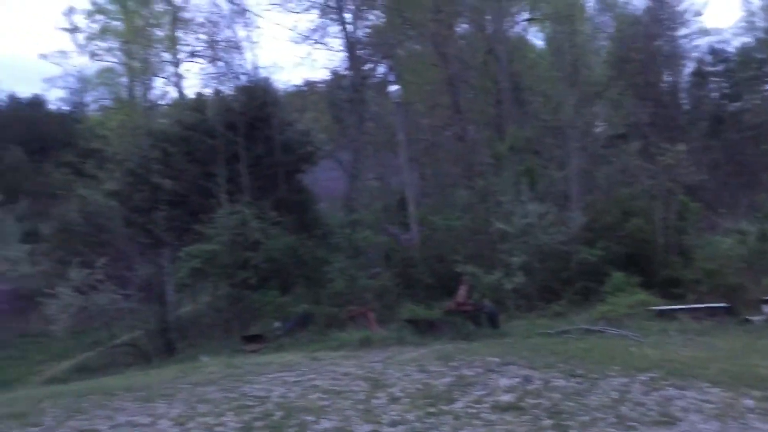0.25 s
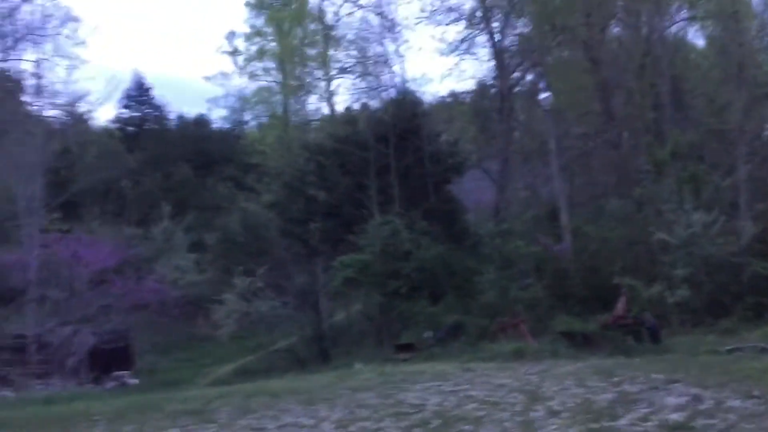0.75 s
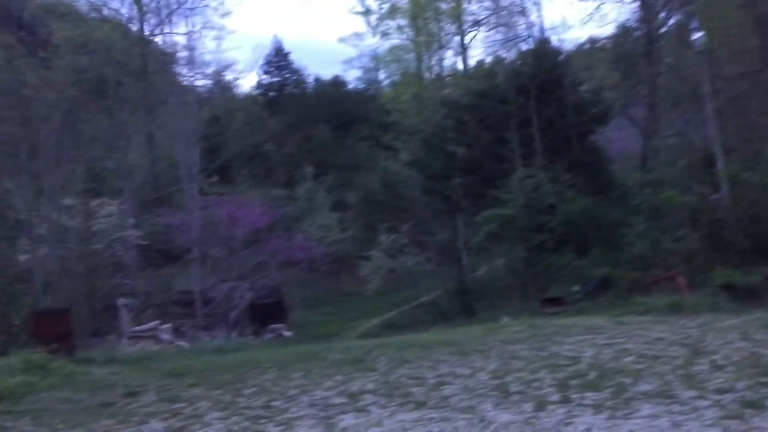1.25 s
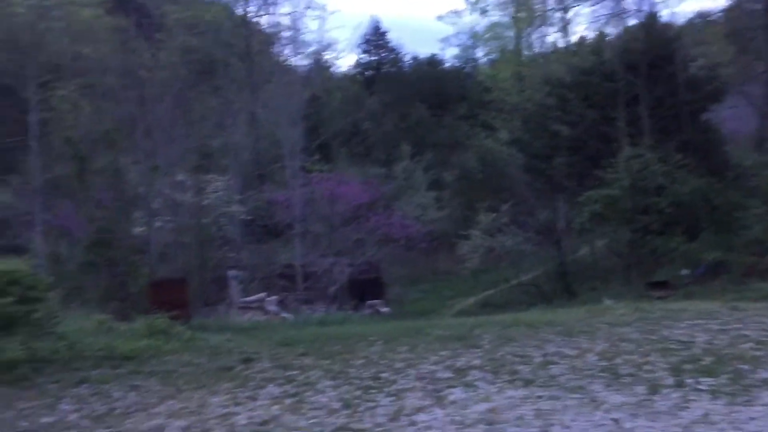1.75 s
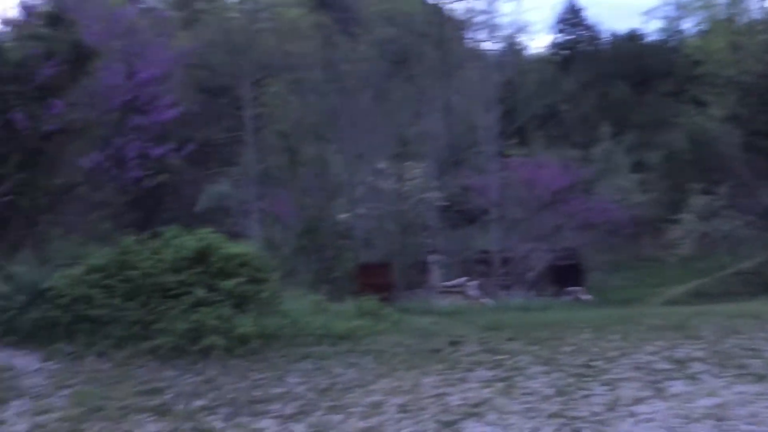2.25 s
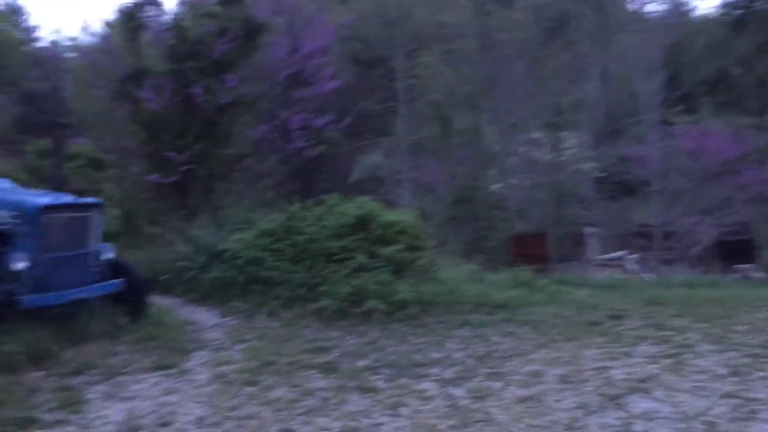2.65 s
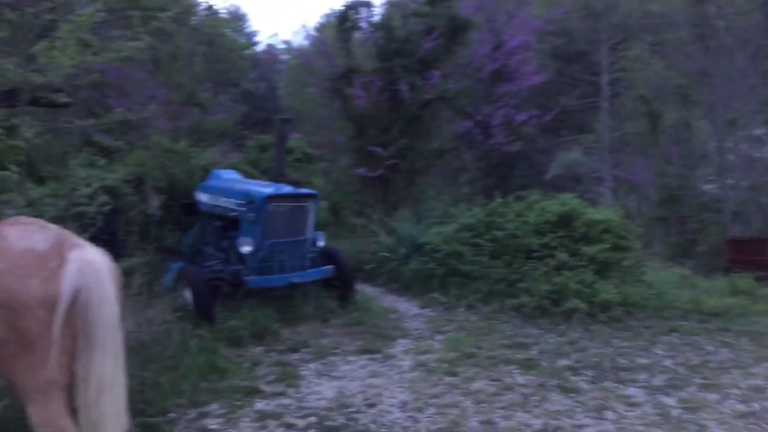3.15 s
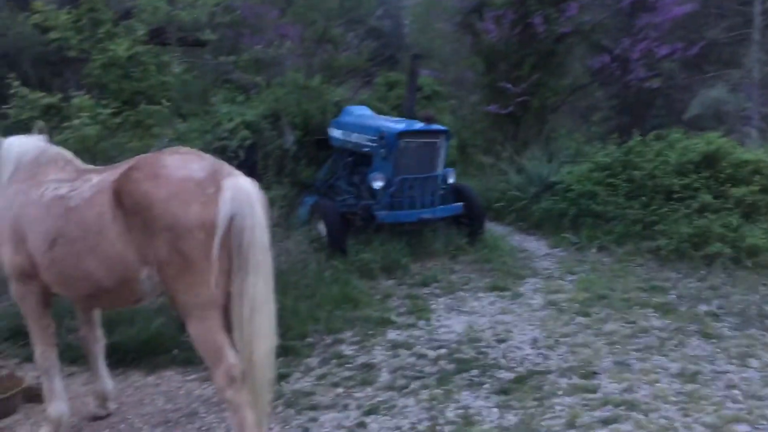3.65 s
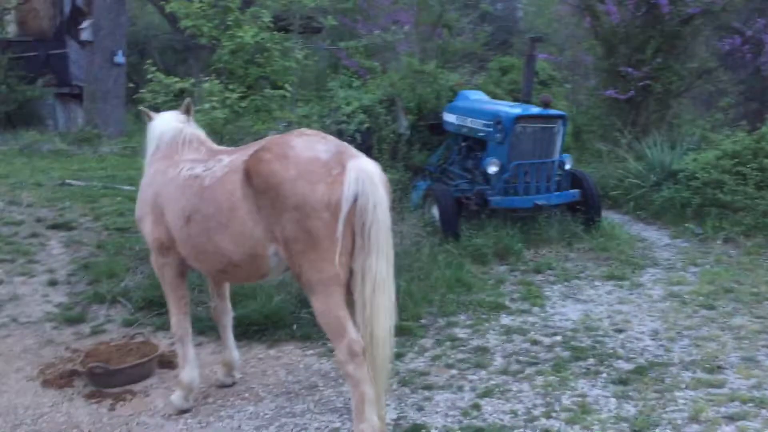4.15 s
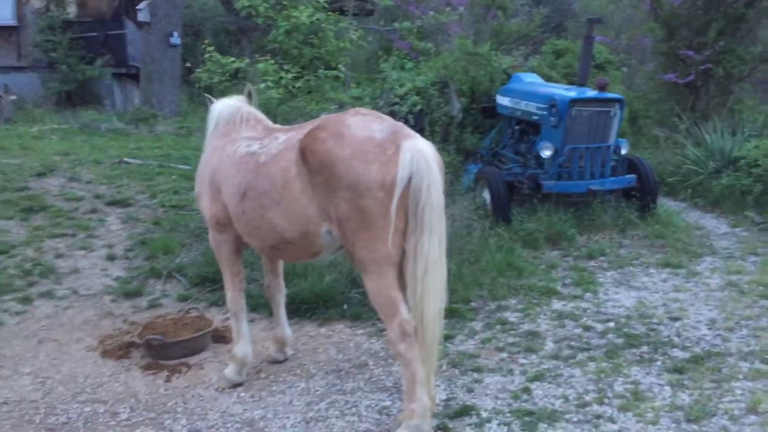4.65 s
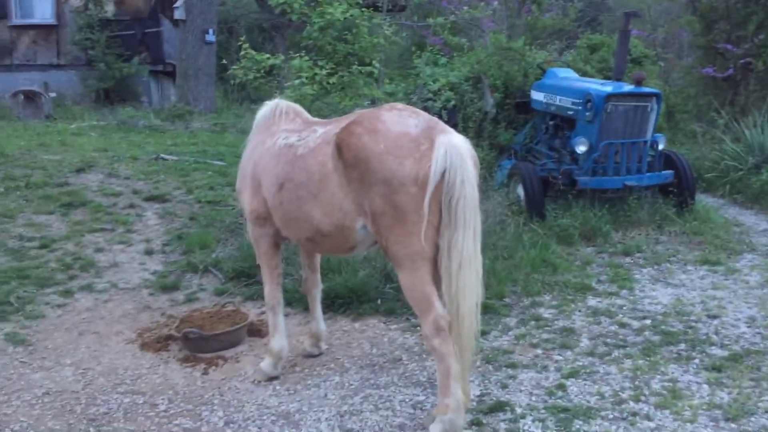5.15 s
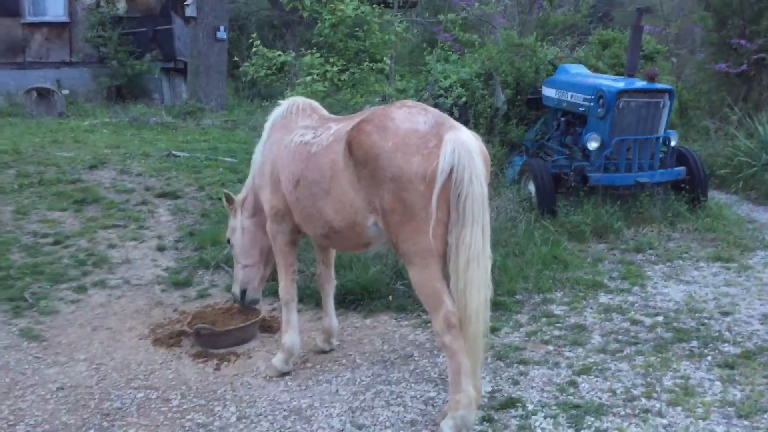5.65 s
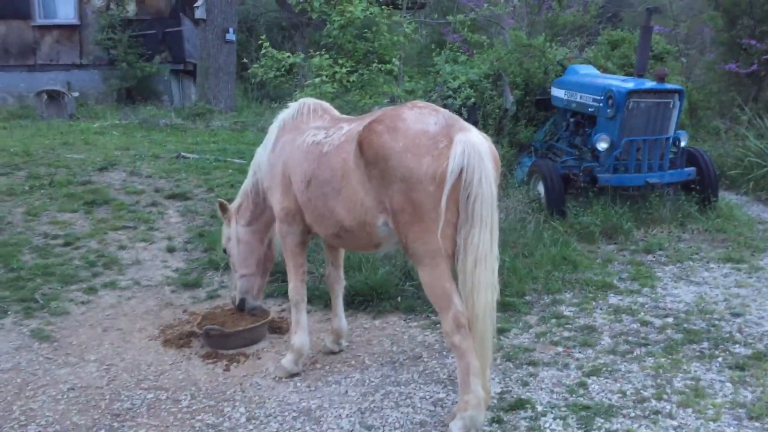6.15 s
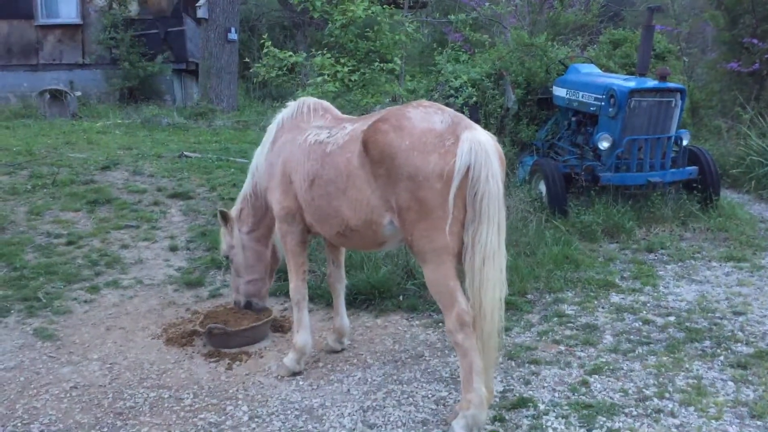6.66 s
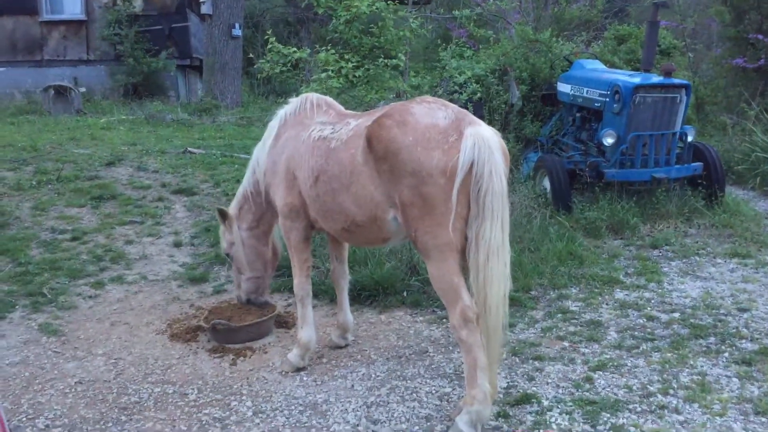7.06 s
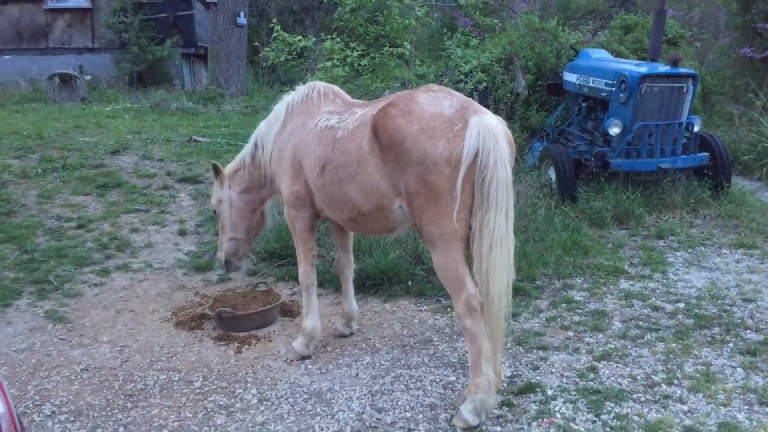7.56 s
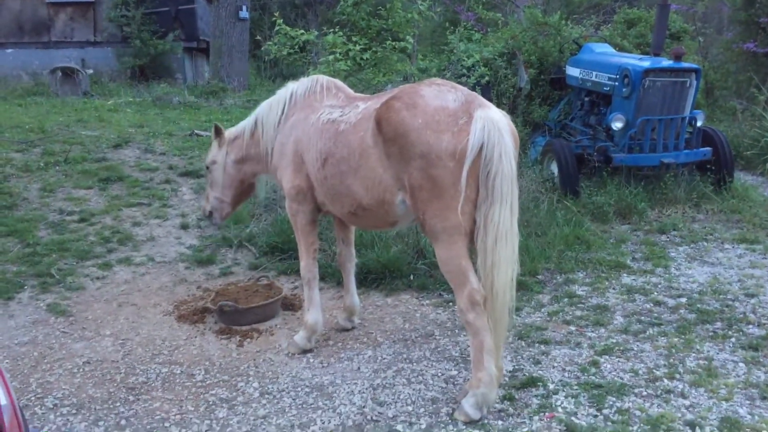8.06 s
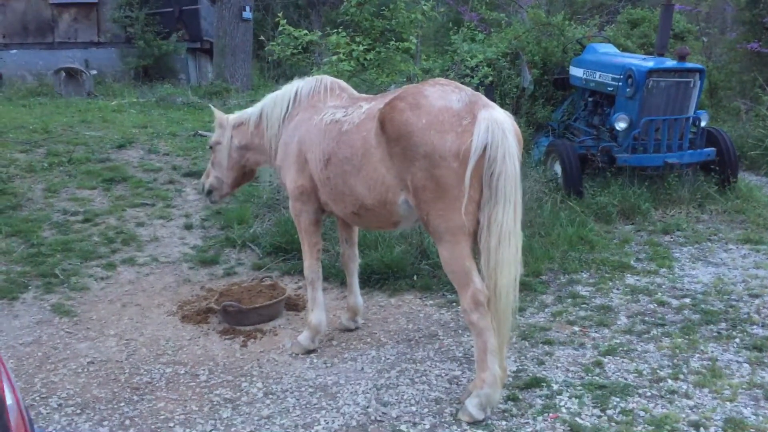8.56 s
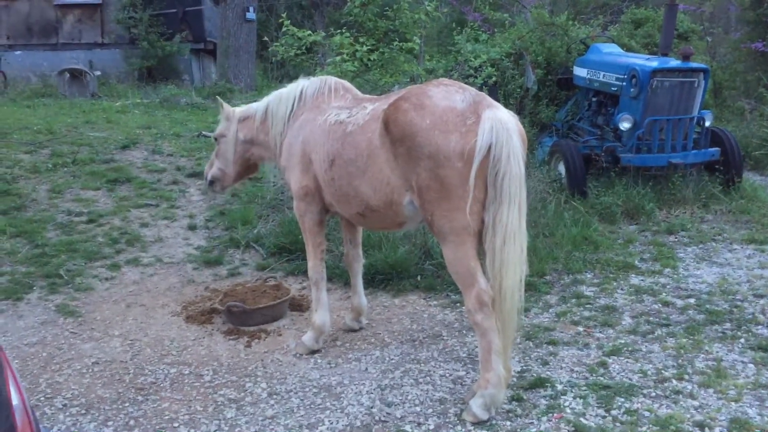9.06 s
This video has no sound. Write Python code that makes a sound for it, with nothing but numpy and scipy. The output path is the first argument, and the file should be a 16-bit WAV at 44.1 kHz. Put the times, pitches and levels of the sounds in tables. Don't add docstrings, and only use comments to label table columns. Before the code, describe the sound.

A continuous chorus of many small frogs runs for about 9.3 seconds, each giving short rising whistled peeps around 3 kHz that merge into a high ringing band; it is loudest in the first instant, then settles slightly softer, with a few nearer peepers standing out and deeper ones further off. Low breeze drums softly on the microphone near 0.3 and 1.5 seconds, again around 6 and 7.3, over faint hiss. Birds chip sharply in the first two seconds, dive and flick around 2.1-2.7, and give low hums near 3.5. Clear level whistles sound at 5.0 and 5.4 with rapid trills from 4.7 to 5.4. Quick dives return at 6.5-7, low swoops at 7.7-8, and long falling notes at 8.8 and 9.0. Faint dull knocks and gravelly rustles from a nearby horse appear throughout, busiest near 6. Trees add a soft outdoor echo.

```python
import sys
import numpy as np
from scipy import signal
from scipy.fft import rfft, irfft, next_fast_len
from scipy.io import wavfile
from scipy.ndimage import uniform_filter1d, map_coordinates

SR = 44100
rng = np.random.default_rng(int(sys.argv[2]) if len(sys.argv) > 2 else 0)


def gain_from_db(level_db):
    decades = np.asarray(level_db, float) / 20
    return 10 ** decades


def transcribe(u):
    v = np.clip(np.atleast_2d(u).T, -1, 1)
    q = np.round(v * 32767).astype(np.int16)
    wavfile.write(sys.argv[1], SR, q)


N = 411012

# (delay [s], level [dB])
TRUNK_RETURNS = [
    (0, 2),
    (.009, -3),
    (.018, -5),
    (.028, -7),
]


def unit(x):
    return x / np.sqrt(np.mean(x ** 2) + 1e-20)


def along(points, hz):
    f, v = np.transpose(points)
    return np.interp(np.log(hz + 1), np.log(f + 1), v)


def curve(rows):
    return np.interp(np.arange(N) / SR, *np.transpose(rows))


def wobble(rate):
    knots = rng.standard_normal(int(N * rate / SR) + 4)
    return map_coordinates(knots, [np.arange(N) * rate / SR])


def rush(spectrum, count=N):
    m = next_fast_len(count)
    gain = gain_from_db(along(spectrum, np.fft.rfftfreq(m, 1 / SR)))
    return unit(irfft(rfft(rng.standard_normal(m)) * gain, m)[:count])


def add(out, s, sound):
    part = out[round((s + 1) * SR):][:len(sound)]
    part += sound[:len(part)]


def whistles(notes, edge, gain_db=3, second_db=None, third_db=-60, tilt_db=0, flutter_db=0.0,
             rich_hz=0, waver_hz=0):
    out, waver = np.zeros(N + 2 * SR), waver_hz * wobble(60)
    for s, length, first, middle, last, db in notes:
        u = np.linspace(0, 1, int(length * SR))
        hz = first * (1 - u) * (1 - 2 * u) + 4 * middle * u * (1 - u) + last * u * (2 * u - 1)
        hz = hz + waver[np.clip(int(s * SR) + np.arange(len(u)), 0, N - 1)]
        phase = 2 * np.pi * (np.cumsum(hz) / SR + rng.random())
        tone = np.sin(phase)
        if second_db is not None:
            overtones = gain_from_db(second_db) * np.sin(2 * phase) + gain_from_db(third_db) * np.sin(3 * phase)
            tone += overtones * (hz > rich_hz) * (hz < 6300)
        shape = np.sin(np.pi / 2 * np.clip(np.minimum(u, 1 - u) / edge, 0, 1)) ** 2
        lean = gain_from_db(tilt_db * np.log2(hz / middle))
        add(out, s, gain_from_db(db + gain_db) * shape * lean * tone)
    unsteady = np.tanh(wobble(90) / 1.5)
    return out[SR:N + SR] * gain_from_db(1.5 * flutter_db * unsteady)


def sweeps(rows, halfway=0.46):
    return [(s, length, first, first + halfway * (last - first), last, db)
            for s, length, first, last, db in rows]


def woods(x, wet_db, blur_db, blur_s=0.053):
    # (frequency [Hz], t60 [s])
    decay = [(1500, 1), (4000, 1), (8000, 0.99), (14000, 0.062)]
    out, at, lag = x.copy(), np.arange(N) / SR, np.arange(SR) / SR
    for shift in range(2):
        hz, t, z = signal.stft(rng.standard_normal(SR), SR, nperseg=256)
        z = z * gain_from_db(-60 * t / along(decay, hz)[:, None])
        tail = signal.istft(z, SR, nperseg=256)[1][:SR]
        blur = rng.standard_normal(SR) * gain_from_db(-60 * lag / blur_s)
        both = gain_from_db(wet_db) * tail / np.linalg.norm(tail) + gain_from_db(blur_db) * blur / np.linalg.norm(blur)
        share = np.cos(np.pi * (at / .9 + shift / 2))
        out += signal.fftconvolve(x * share, both)[:N] * share * np.sqrt(2)
    return out


def air():
    # (frequency [Hz], level per Hz [dB])
    rumble = [(15, -37), (25, -18), (59, 1.5), (139, 2), (299, -8), (400, -20), (520, -38.5), (880, -120)]
    # (frequency [Hz], level per Hz [dB])
    drumming = [(40, -61), (85, -10), (135, 1), (200, -3.5), (320, -44)]
    # (frequency [Hz], level per Hz [dB])
    hiss = [(60, -35.5), (250, -2.5), (600, -3.5), (1200, -7), (2200, -7.5), (3400, 0), (4200, -10),
            (6000, -12.5), (8000, -15.5), (10300, -19.5), (11500, -18.5), (15700, -21), (16000, -53.5)]
    # (time [s], swell [dB])
    gusts = [
        (0, 6),
        (.33, 11.5),
        (1.45, 10.5),
        (5.1, 4),
        (5.6, 3),
        (5.95, 7.5),
        (7.3, 8),
    ]
    breeze_db, gust_s = -72.5, 0.25
    at = np.arange(N) / SR
    gust_db = sum(db * np.exp(-((at - s) / gust_s) ** 2) for s, db in gusts)
    breeze = gain_from_db(breeze_db + 0.48 * gust_db + 2.0) * unit(gain_from_db(3.0 * wobble(12)) * rush(rumble))
    mesh = unit(gain_from_db(3 * wobble(15)) * rush(drumming))
    breeze += gain_from_db(breeze_db + 0.5) * (gain_from_db(gust_db) - 1) * mesh
    return breeze + gain_from_db(-68 + 0.61 * wobble(6.5)) * rush(hiss)


def horse():
    # (time [s], peak level [dB], frequency [Hz])
    knocks = [(0.247, -58.5, 558), (0.614, -69.5, 550), (0.763, -65, 874), (1.077, -76, 530),
              (1.287, -56.5, 716), (1.646, -68, 547), (1.978, -74, 1280), (2.074, -62.5, 617),
              (2.584, -63, 1280), (3.657, -72, 623), (4.287, -68, 560), (4.815, -61, 604),
              (4.838, -65, 640), (5.835, -66, 526), (5.86, -57.5, 622), (5.9, -59, 440), (6.025, -65, 985),
              (6.066, -60.5, 930), (6.38, -61.5, 550), (6.643, -66.5, 624), (7.2, -59, 584),
              (7.341, -60.5, 593)]
    # (time [s], length [s], centre [Hz], width [octaves], level [dB])
    rustles = [(4.625, .025, 12500, .4, -66), (7.47, .105, 11500, .9, -66), (6.055, .035, 1800, 1.2, -64),
               (6.28, .015, 9000, .4, -72), (2.575, .05, 900, .9, -64), (.24, .04, 600, .8, -66),
               (7.505, .04, 1450, .3, -68), (5.85, .09, 1200, 1.1, -71), (.78, .03, 4000, 1.2, -68),
               (4.2, .2, 5500, .6, -70), (1.96, .04, 1200, 1, -70), (4.75, .12, 600, .5, -68),
               (4.3, .3, 570, .2, -72)]
    out, t = np.zeros(N + 2 * SR), np.arange(SR // 10) / SR
    for s, db, hz in knocks:
        ring = np.sin(2 * np.pi * hz * t) + 0.089 * np.sin(2 * np.pi * 2.4 * hz * t)
        push = np.exp(-((t - .014) / .0042) ** 2)
        scuff = 0.15 * np.convolve(rng.standard_normal(len(t)), np.hanning(15), "same")
        add(out, s - .008, gain_from_db(db + 5.5) * push * (ring + scuff))
    for s, length, hz, octaves, db in rustles:
        count = int(length * SR)
        far, half = 2 ** (2 * octaves), 2 ** (octaves / 2)
        band = [(hz / far, -40), (hz / half, -3), (hz, 0), (hz * half, -3), (hz * far, -40)]
        grit = gain_from_db(1.9 * wobble(500)[:count])
        add(out, s, gain_from_db(db) * np.hanning(count) * grit * rush(band, count=count))
    return out[SR:N + SR]


def songs():
    # (time [s], opening level [dB], stroke level [dB], strokes [count])
    starts = [
        (-.22, -54, -63, 4),
        (3.915, -53, -65, 5),
        (8.764, -51, -63, 3),
    ]
    # (time after start [s], length [s], first [Hz], last [Hz], level re song [dB])
    opening = [
        (-.015, .055, 4900, 4620, -8),
        (.033, .036, 4700, 3400, 3),
    ]
    # (time [s], first [Hz], last [Hz], level [dB])
    scatter = [
        (2.318, 3300, 4300, -61),
        (2.335, 4200, 5200, -69),
        (2.422, 3300, 4300, -67),
        (2.715, 3200, 4050, -62),
        (2.8, 3300, 4100, -66),
        (4.2, 4600, 6400, -69),
        (4.28, 6000, 8300, -70),
        (4.5, 4700, 6000, -69),
        (4.58, 5200, 5700, -69),
    ]
    strokes_after_s, stroke_every_s, stroke_s = .265, .097, .042
    rows, strokes = [], [(s, first, last, db) for s, first, last, db in scatter]
    for s, opening_db, db, count in starts:
        rows += [(s + after, length, first, last, opening_db + under_db)
                 for after, length, first, last, under_db in opening]
        strokes += [(s + strokes_after_s + k * stroke_every_s, 3500, 5800, db) for k in range(count)]
    smeared = [(s + late, stroke_s, first, last, db + under_db) for s, first, last, db in strokes
               for late, under_db in TRUNK_RETURNS]
    return sweeps(rows), sweeps(smeared, .57)


def low_singer():
    # (time [s], length [s], pitch [Hz], level [dB])
    hums = [(3.4, .05, 1770, -65), (3.425, .04, 2150, -69), (3.465, .06, 1770, -68), (3.5, .035, 1640, -65),
            (3.52, .03, 2080, -67), (3.56, .2, 2030, -68), (3.65, .1, 2300, -72), (3.55, .06, 2250, -72),
            (3.585, .06, 1630, -69), (3.65, .025, 1750, -63), (3.69, .03, 1620, -66), (3.6, .08, 1500, -71),
            (3.755, .03, 1500, -69), (3.79, .04, 2350, -68), (3.845, .055, 1540, -73),
            (3.86, .035, 1640, -73), (8.02, .06, 2370, -70)]
    # (time [s], length [s], first [Hz], last [Hz], level [dB])
    swoops = [(.57, .048, 2550, 1820, -62), (.625, .04, 2400, 2450, -68), (.665, .03, 2450, 1880, -65),
              (.903, .045, 2520, 1880, -60), (.94, .035, 1870, 1850, -67), (.97, .05, 2400, 2050, -69),
              (3.372, .035, 1870, 1760, -68), (3.775, .03, 2000, 1650, -67), (3.955, .025, 2800, 2000, -65),
              (4.563, .033, 2110, 2530, -66), (6.612, .02, 1650, 2600, -64), (6.866, .024, 1700, 2550, -67),
              (7.68, .022, 2250, 2550, -66), (7.746, .036, 2830, 1700, -58), (7.825, .03, 2750, 1900, -60),
              (7.858, .032, 1800, 2300, -60), (7.878, .045, 2200, 2440, -53), (7.948, .03, 2000, 2330, -64),
              (7.962, .045, 2250, 2420, -55)]
    sagging = [(s, length, hz, .975 * hz, db) for s, length, hz, db in hums]
    return sweeps(sagging + swoops, .45)


def warbler():
    # (time [s], top [Hz], level [dB])
    hooked = [(.565, 5890, -67), (1.44, 5790, -65), (1.527, 6100, -62), (1.992, 5800, -61),
              (2.24, 5700, -65), (3.24, 5600, -76), (3.445, 5750, -75), (6.08, 5600, -73),
              (4.532, 5800, -61), (4.85, 5750, -62), (8.08, 5720, -72), (8.29, 5670, -73), (8.5, 5650, -69),
              (8.635, 5680, -66)]
    # (time [s], pitch [Hz], level [dB])
    seeps = [(2.851, 5580, -73), (4.343, 7300, -68), (4.438, 7300, -68), (4.535, 7300, -74),
             (8.725, 6820, -69), (8.968, 7600, -65), (9.005, 7600, -68), (4.243, 7350, -71),
             (4.3, 7600, -72), (9.09, 7400, -72), (9.187, 7300, -70), (9.288, 7300, -71)]
    # (time [s], length [s], first [Hz], last [Hz], level [dB])
    glides = [(.245, .022, 5700, 6050, -69), (.262, .022, 5550, 5500, -64), (.388, .022, 5350, 5250, -69),
              (.65, .018, 4250, 4350, -76), (.675, .018, 4400, 4450, -75), (7.375, .04, 5600, 6100, -78),
              (7.415, .04, 6100, 5500, -78), (8.52, .025, 5400, 5000, -67), (.812, .026, 5500, 5000, -68),
              (2.475, .032, 5380, 6220, -68), (4.259, .037, 6030, 6970, -63), (4.52, .025, 3750, 3250, -58),
              (4.64, .05, 5500, 4400, -71), (4.95, .04, 7570, 7150, -72), (5.0, .06, 7150, 7300, -73),
              (8.565, .05, 3350, 4300, -66), (8.65, .035, 3350, 3900, -70), (9.245, .03, 5500, 4900, -67),
              (8.566, .044, 4710, 5940, -67), (8.598, .017, 5900, 3950, -66)]
    hooks = [(s, .04, .92 * hz, hz, .86 * hz, db) for s, hz, db in hooked]
    return hooks + sweeps([(s, .022, hz, .94 * hz, db) for s, hz, db in seeps] + glides)


def thrush():
    # (time [s], length [s], first [Hz], level [dB])
    drops = [
        (2.133, .03, 6700, -59),
        (2.515, .034, 7770, -60),
        (2.63, .026, 5500, -64),
        (6.53, .014, 6550, -60),
        (6.674, .024, 5900, -59),
        (6.772, .015, 6550, -59),
        (6.925, .028, 5800, -60),
        (7.028, .016, 6500, -60),
    ]
    # (time [s], level [dB])
    closings = [
        (2.243, -69),
        (6.54, -57),
        (6.783, -58),
        (7.038, -57),
    ]
    # (time [s], length [s], first [Hz], last [Hz], level [dB])
    flicks = [
        (2.158, .035, 3650, 4150, -56),
        (2.498, .013, 5890, 8110, -66),
        (2.542, .022, 3950, 4150, -54),
        (5.526, .018, 5400, 8300, -69),
        (5.546, .03, 5400, 7500, -69),
        (6.658, .018, 3300, 5900, -60),
        (6.912, .01, 3300, 7220, -62),
        (8.861, .034, 5200, 7750, -57),
    ]
    # (time [s], length [s], first [Hz], last [Hz], level [dB])
    slides = [(2.585, .04, 7900, 6000, -71), (2.55, .04, 6300, 5900, -74), (3.727, .05, 8550, 7150, -65),
              (6.477, .057, 8120, 6850, -76), (7.388, .045, 8800, 7150, -64), (7.435, .03, 8200, 7100, -66),
              (7.46, .035, 8800, 7100, -69), (7.495, .03, 7600, 6700, -62), (7.58, .055, 6150, 5500, -74),
              (8.395, .05, 8600, 7700, -79), (8.46, .07, 7700, 7100, -78), (8.665, .06, 7750, 7550, -72),
              (8.895, .07, 7750, 7500, -75)]
    # (time [s], length [s], first [Hz], last [Hz], level [dB])
    long_falls = [
        (8.769, .095, 6970, 5080, -62),
        (9.016, .1, 7010, 5190, -61.5),
    ]
    dives = [(s, length, hz, 3550, db) for s, length, hz, db in drops]
    landings = [(s, .017, 4450, 3650, db) for s, db in closings]
    shadow_s, shadow_db = .021, -4
    shadows = [(s + shadow_s, length, first, last, db + shadow_db) for s, length, first, last, db in slides]
    falls = long_falls + [(s + late, length, first, last, db + under_db)
                          for s, length, first, last, db in long_falls
                          for late, under_db in TRUNK_RETURNS[1:3]]
    return sweeps(dives + landings + flicks, .6) + sweeps(slides + shadows, .71) + sweeps(falls, .5)


def trills():
    # (time [s], length [s], first, middle, last pitch [Hz], level [dB])
    held = [
        (4.66, .14, 4420, 4370, 4350, -69),
        (4.8, .25, 4330, 4310, 4280, -70),
        (4.33, .07, 4150, 4050, 3950, -66),
        (4.4, .08, 4030, 4050, 4050, -68),
        (4.3, .2, 2260, 2230, 2220, -79),
        (8.4, .27, 2020, 2020, 2005, -72),
        (8.44, .19, 2020, 2020, 2015, -64),
    ]
    # (time [s], length [s], level [dB])
    high_runs = [
        (4.738, .65, -60.5),
    ]
    low_runs = [
        (4.742, .25, -61),
        (5.175, .17, -58),
    ]
    bright_runs = [
        (4.78, .38, -54),
        (5.17, .25, -55),
    ]
    # (syllables a second, flicks a syllable, first [Hz], last [Hz], runs, tilt [dB/octave])
    kinds = [(20, 3, 3900, 5500, high_runs, -2),
             (47, 1, 2350, 1900, low_runs, 6),
             (47, 1, 2600, 2350, bright_runs, 0)]
    uneven_s, uneven_db = .002, 2.5
    out = whistles(held, .3, flutter_db=2, waver_hz=8)
    for rate, count, first, last, runs, tilt_db in kinds:
        rows = []
        for s, length, db in runs:
            for u in np.arange(0, length * rate) / (length * rate):
                swell_db = db + 6 * np.sin(np.pi * u ** .45) - 6
                for k in range(count):
                    start = s + u * length + .0085 * k + rng.normal(0, uneven_s)
                    rows.append((start, .011, first, last, rng.normal(swell_db, uneven_db)))
        out = out + whistles(sweeps(rows), .25, tilt_db=tilt_db)
    return out


def birds():
    # (time [s], level [dB])
    nasal = [
        (0.462, -66),
        (0.789, -67),
        (1.107, -62),
    ]
    # (time [s], first [Hz], level [dB])
    rising = [(0.398, 5100, -66.5), (0.603, 5260, -61), (0.686, 5720, -68), (0.9, 5780, -69.5),
              (1.114, 6500, -70.5), (1.276, 6160, -72), (1.472, 5940, -72), (1.657, 5600, -76),
              (1.921, 5840, -68.5), (2.44, 6500, -75), (2.87, 5570, -67.5), (3.778, 5520, -61.5),
              (4.865, 5400, -65.5), (6.309, 5330, -72), (7.684, 5960, -73)]
    # (time [s], level [dB])
    ticks = [
        (0.011, -69),
        (0.11, -68),
        (0.207, -67.5),
        (0.307, -76),
        (8.68, -68),
    ]
    # (time [s], length [s], level [dB])
    level_whistle = [(4.33, .05, -58), (4.39, .08, -59), (4.71, .1, -66), (5.012, .175, -47),
                     (5.19, .1, -63), (5.3, .13, -70), (5.43, .11, -47), (5.53, .07, -55), (5.6, .12, -63),
                     (5.74, .08, -70), (5.82, .13, -65)]
    pips = [(s, .033, 1880, 1900, 1890, db) for s, db in nasal]
    chip_top_hz = 7400
    chips = sweeps([(s, .012, hz, chip_top_hz, db) for s, hz, db in rising]
                   + [(s, .014, chip_top_hz, 6300, db) for s, db in ticks], 0.57)
    openings, strokes = songs()
    soft = .17
    near = whistles(thrush(), soft, 3.14, -16, tilt_db=-5.5, rich_hz=5150, flutter_db=2.5, waver_hz=50)
    near += whistles(pips, soft, 0.74, 1.6, -15.5)
    near += gain_from_db(-15) * np.roll(near, int(.08 * SR))
    far = whistles(chips, soft)
    far += whistles(openings, .12, 3, tilt_db=-3, flutter_db=3)
    far += whistles(strokes, 0.12, -2.5, tilt_db=-10, flutter_db=4, waver_hz=120)
    low = whistles(low_singer(), 0.15, .6, tilt_db=6, flutter_db=1.8, waver_hz=18)
    close = whistles(warbler(), soft, 4.7, flutter_db=3.5, waver_hz=70.5)
    level_notes = [(s, length, 3650, 3725, 3670, db) for s, length, db in level_whistle]
    scoop = (4.997, .03, 3200, 3480, 3670, -53)
    close += whistles(level_notes + [scoop], .09, 0.52, -33, -32, flutter_db=3.5, waver_hz=32)
    overhead = .65
    out = woods(near + overhead * close + trills(), -10, -4, blur_s=.07) + (1 - overhead) * close
    return out + woods(far, -6, -1, blur_s=.2) + woods(low, -8, -3)


def peeps(start, hz, db, rise_hz, length):
    return np.transpose([start, length, hz, hz + .55 * rise_hz, hz + rise_hz, db])


def frogs(count=95):
    # (time [s], level [dB])
    chorus = [(0, -38.5), (.25, -46), (.7, -41.5), (1.2, -41.5), (1.6, -43), (2.1, -43), (2.6, -44),
              (3, -44), (3.6, -45), (4.5, -47.5), (5.1, -45.5), (5.7, -46), (6.3, -46), (7, -46),
              (7.9, -45), (8.7, -47), (9.32, -46.5)]
    # (frequency [Hz], level [dB])
    throats = [(2700, -1), (2780, -5.5), (2860, 3), (2950, 1), (3080, 2), (3170, -0.5), (3250, -8.5)]
    # (time [s], starting pitch [Hz], level [dB])
    near_frogs = [(0.019, 3177, -52), (0.215, 2705, -44), (0.245, 2848, -45), (0.245, 3043, -49),
                  (.35, 2773, -47.5), (0.328, 2974, -53), (0.445, 2912, -45), (.49, 3045, -48.5),
                  (0.53, 2835, -55), (0.631, 2790, -48.5), (0.745, 2676, -53), (0.92, 2852, -48.5),
                  (.94, 2990, -58), (.76, 2950, -51), (.33, 3070, -52.5), (1.012, 2918, -52),
                  (1.139, 2800, -45), (1.2, 2896, -47), (1.33, 2810, -67), (1.53, 2923, -50),
                  (1.785, 2853, -48.5), (1.9, 2940, -49.5), (2.565, 2874, -47.5), (2.699, 2790, -55),
                  (3.09, 2870, -56), (3.421, 2830, -64), (3.76, 3074, -54), (4.24, 2983, -51.5),
                  (4.459, 2720, -61), (4.574, 3067, -52), (4.941, 2870, -55), (5.33, 3065, -61),
                  (5.908, 2896, -55), (5.948, 3067, -53), (7.13, 3017, -56), (7.4, 2885, -53.5),
                  (7.9, 3040, -55.5), (8.38, 2892, -50.5), (8.815, 3010, -47)]
    # (time [s], starting pitch [Hz], level [dB])
    deep_frogs = [(.073, 2482, -60), (.864, 2470, -62.5), (1.509, 2440, -72.5), (1.656, 2463, -59.5),
                  (1.73, 2363, -67), (1.804, 2456, -69.5), (2.29, 2426, -66.5), (2.446, 2443, -64.5),
                  (2.9, 2430, -68), (3.031, 2510, -72), (3.199, 2520, -66), (3.482, 2446, -65),
                  (3.599, 2550, -75), (4.02, 2476, -70), (4.4, 2504, -66.5), (5.601, 2494, -68.5),
                  (5.83, 2450, -69), (6.299, 2540, -68), (6.45, 2490, -75), (6.601, 2470, -69),
                  (6.867, 2490, -63), (7.101, 2570, -77), (7.42, 2530, -68), (7.8, 2530, -58.5),
                  (8.262, 2475, -69), (8.448, 2470, -71.5), (8.651, 2550, -66), (8.851, 2600, -64),
                  (9.131, 2580, -79)]
    pitch, period, phase, near = rng.random((count, 4)).T
    hz = np.linspace(2610, 3110, count) + 20 * pitch
    start = (np.arange(14)[:, None] + phase) * (.75 + .4 * period) - .9
    jitter, bend, size = rng.standard_normal((3,) + start.shape)
    start = np.clip(start + .04 * jitter, -.9, N / SR)
    db = along(throats, hz + 130) + 6 * near + 1.8 * size
    rows = peeps(start.ravel(), (hz + 15 * bend).ravel(), db.ravel(), 240.76, np.full(start.size, .13))
    crowd = woods(whistles(rows[start.ravel() < N / SR], 0.21, flutter_db=1.1), -4.5, -5.5)
    crowd /= np.sqrt(np.abs(uniform_filter1d(crowd ** 2, SR // 3)) + 1e-12)
    s, hz, db = np.transpose(near_frogs)
    rows = peeps(s - .015, hz - 30, db, 270.4, np.full(len(s), .12))
    close = whistles(rows, 0.17, flutter_db=2.0, waver_hz=14.1)
    s, hz, db = np.transpose(deep_frogs)
    deep = whistles(peeps(s - .015, hz - 20, db, 200, np.full(len(s), .15)), 0.16)
    return gain_from_db(curve(chorus) - 2.0) * crowd + woods(close, -4.0, -7) + woods(deep, 0.5, -2.1)


def scene():
    return (air() + horse() + birds() + frogs())[None]


def band_limit(x):
    return signal.sosfilt(signal.butter(12, 15790, fs=SR, output="sos"), x)


def record(dry):
    # (low [Hz], high [Hz], share of time silent [0-1])
    gated = [
        (3450, 3620, .48),
        (3620, 3790, .4),
        (3790, 3960, .2),
        (3960, 4140, .13),
        (4140, 4480, .03),
    ]
    hz, _, z = signal.stft(dry[0], SR, nperseg=1024)
    for low, high, share in gated:
        band = (hz > low) & (hz < high)
        power = uniform_filter1d(np.mean(np.abs(z[band]) ** 2, 0), size=7)
        z[band] *= power > np.quantile(power, share)
    mix = signal.istft(z, SR, nperseg=1024)[1][None, :N]
    return band_limit(mix)


dry = scene()
out = record(dry)
transcribe(out)
```